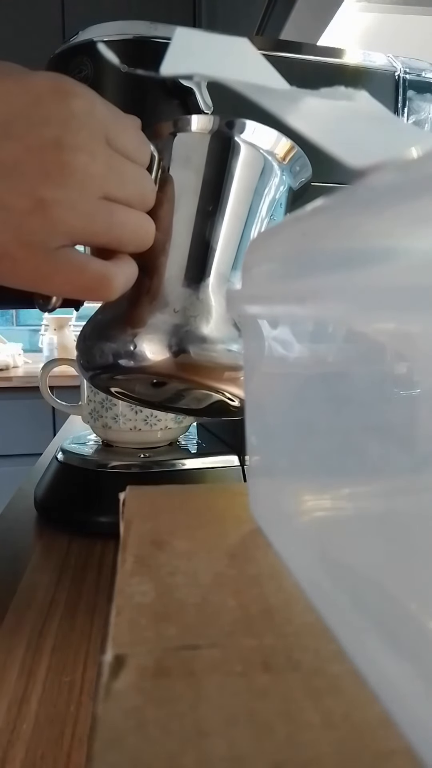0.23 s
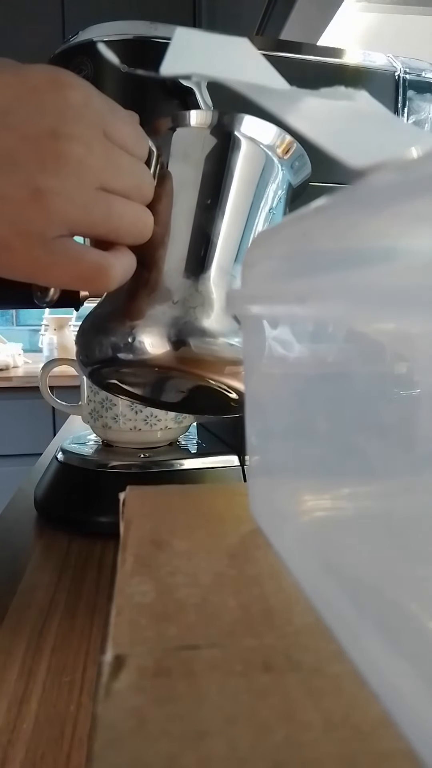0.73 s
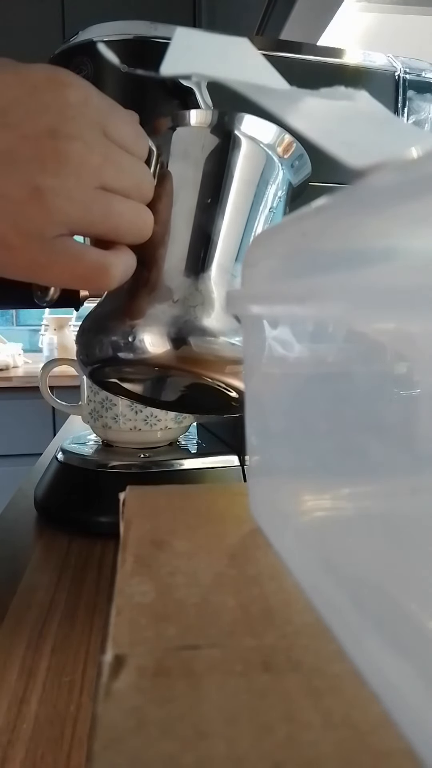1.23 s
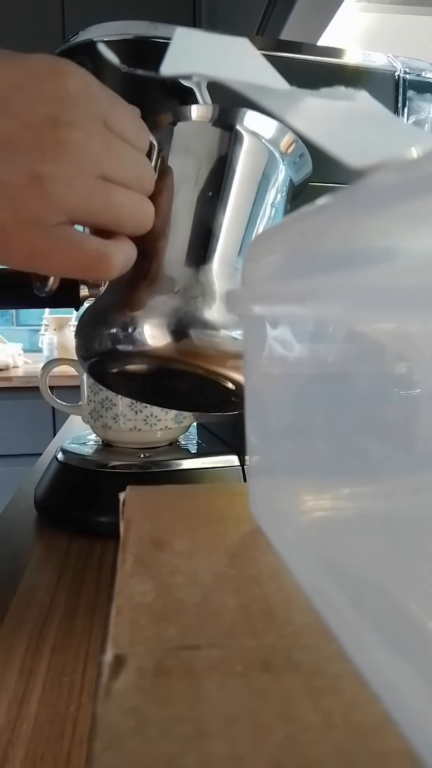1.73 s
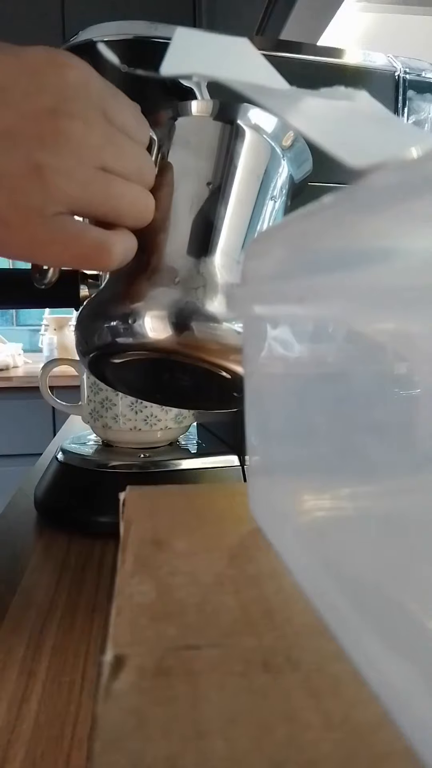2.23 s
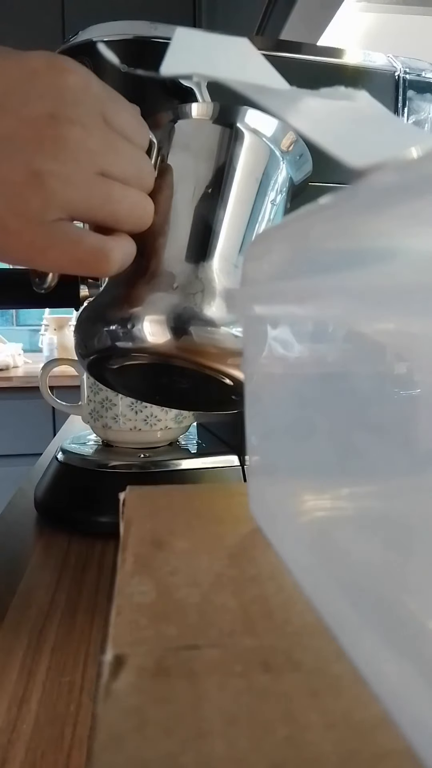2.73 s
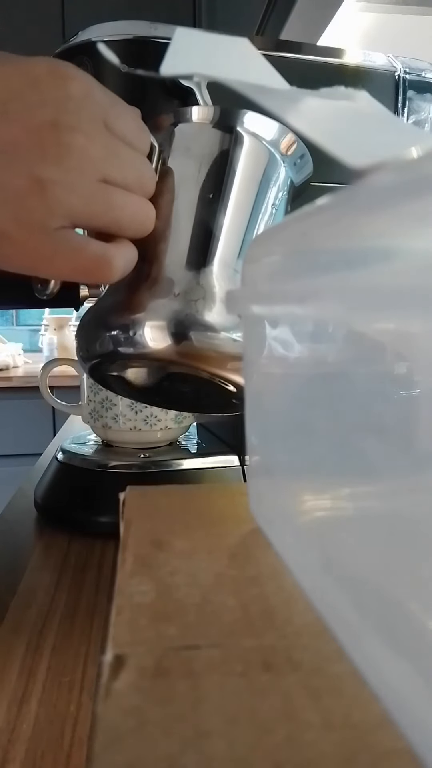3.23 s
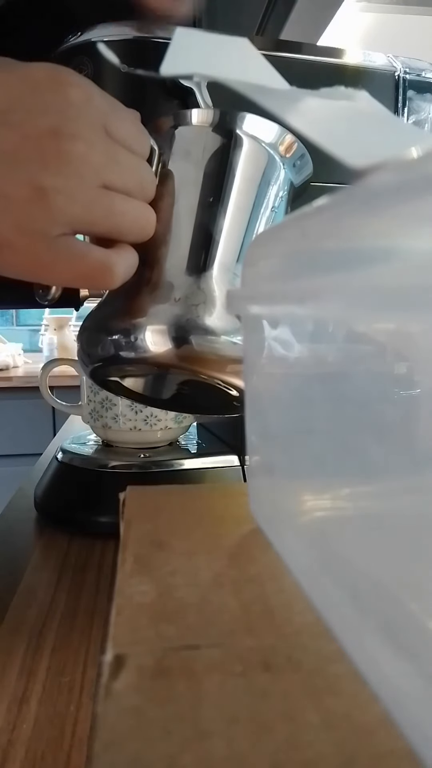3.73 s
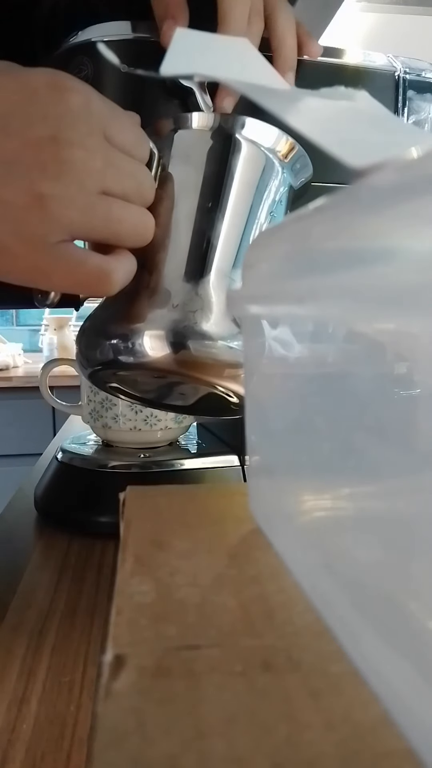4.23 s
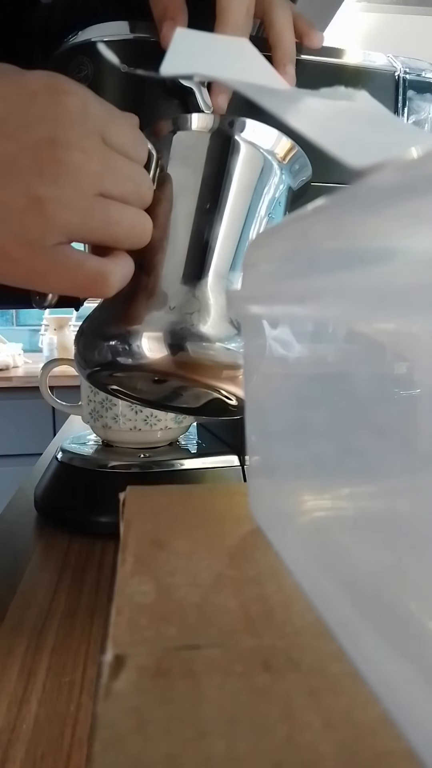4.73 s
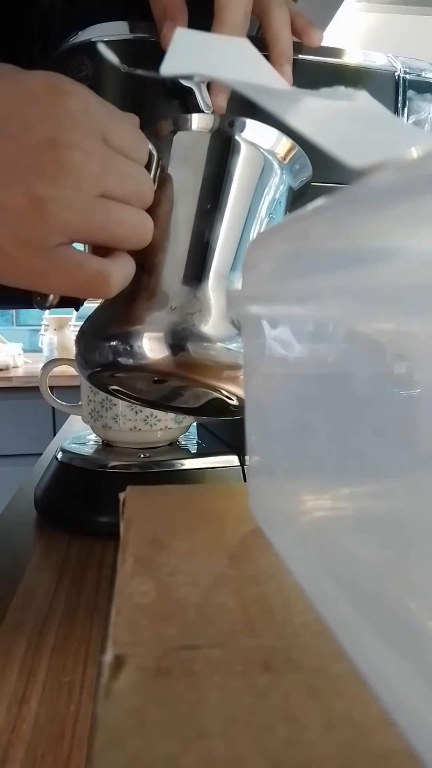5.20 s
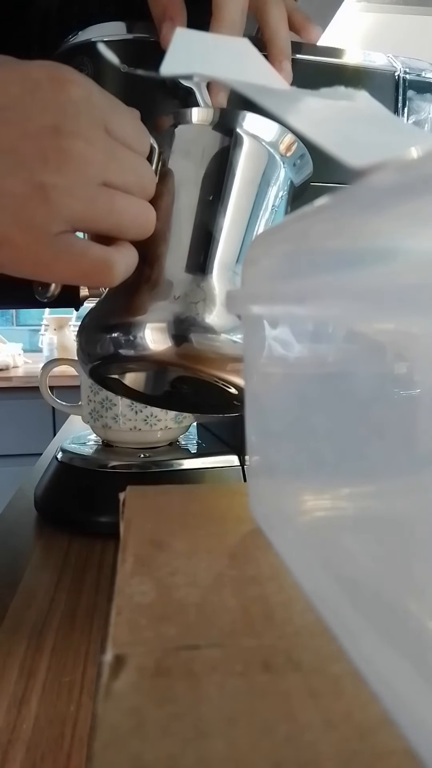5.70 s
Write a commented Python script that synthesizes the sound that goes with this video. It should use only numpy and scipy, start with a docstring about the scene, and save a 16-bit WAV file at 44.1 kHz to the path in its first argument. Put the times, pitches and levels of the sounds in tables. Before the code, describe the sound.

Close-up milk steaming in a small kitchen: sputtering hiss and bubbling, a quiet submerged moan, then renewed spitting and gurgling.

```python
"""A small kitchen, where a steam wand froths milk in a steel jug. With the tip at the surface the jet
tears air in with hissing bursts; sunk, it mostly gurgles. These sounds are modulated noise, filtered by
spectra with narrow resonances and dips. The swirling milk rumbles, bubbles crack, and resonators turn
noise into a moan under the sunk tip and hollow notes in the foam. About once a second the pump buzzes
on mains harmonics."""
import sys
import numpy as np
from scipy import signal
from scipy.io import wavfile
from scipy.ndimage import uniform_filter1d

SR = 44100
rng = np.random.default_rng(int(sys.argv[2]) if len(sys.argv) > 2 else 0)


def int16_out(signal):
    """Quantize to a 16-bit WAV file."""
    q = np.round(np.clip(np.atleast_2d(signal).T, -1, 1) * 32767)
    wavfile.write(sys.argv[1], SR, q.astype(np.int16))


N = 262836
T = np.arange(N) / SR

# spectrum of the tearing hiss: f/Hz, relative level per Hz/dB
HISS_SPECTRUM = [(2060, -23), (3500, -13.5), (4620, -9), (4980, -11), (5380, -9), (5620, -5.5), (7280, -1),
                 (8310, 7.5), (9850, 6.5), (10700, 2.5), (12300, 4.5), (14900, -3.5), (15800, -18)]
# spectrum of the gurgle with the tip at the surface: f/Hz, relative level per Hz/dB
GURGLE_SPECTRUM = [(130, -48), (220, -27), (340, -13), (509, -0.5), (615, -1.5), (742, 3), (949, 2),
                   (1200, -4), (1620, -5.5), (1850, -10.5), (2330, -2.5), (2850, -11.5), (3390, -7),
                   (4100, -15), (4900, -14), (5600, -20), (7000, -14), (9100, -23), (15400, -120)]

HOLD_S, FALL_CURVE = 0.00078, 1.013  # pause at the peak; exponent of the fall, above 1 starts slower
TEAR_HZ, TEAR_HZ_PER_DB, TEAR_SCATTER_HZ = 9220, 166, 750  # harder bursts tear at a higher pitch
BRIGHT_DB, BRIGHT_DB_PER_S = 2.5, 186  # slow bursts make finer bubbles, so a brighter gurgle
BITE_HZ = 6230  # upper edge of the lower part of the hiss
FOAM_WIDTH_HZ = 176  # this and the other note widths are those of one resonator pass of two
JUG_NOTE_HZ, JUG_NOTE_WIDTH_HZ, WHISTLE_HZ, WHISTLE_WIDTH_HZ = 1605, 84, 3370, 110
POCKET_WIDTH_HZ, UPPER_HZ, UPPER_WIDTH_HZ = 120, 954, 160
STEADY = 0.22  # 0: a note flutters like noise; towards 1 it holds its level
KNOCK_DB = -29  # excitation of the jug knock against that of the crack, before the crack's own trim
MAINS_HZ = 51
PUMP_START_S, PUMP_EVERY_S, PUMP_STROKE_S = 0.915, 0.995, 0.11  # a stroke starts to fade at its length
EDGE_HZ = 15750


def gain_of(db):
    """Amplitude ratio: 20 dB is a factor of ten."""
    return 10 ** (np.asarray(db) / 20)


def evened(x):
    """Normalisation by the root mean square, to rms 1."""
    return x / np.sqrt(np.mean(x ** 2) + 1e-20)


def curves(rows):
    """Linear interpolation of each column in time; the end values are held."""
    times, *columns = np.transpose(rows)
    return [np.interp(T, times, column) for column in columns]


def colour(x, points, ring=1, size=8192):
    """Minimum-phase filtering: a spectrum plus narrow peaks and dips, keeping the power of white noise."""
    # narrow resonances and dips of the sound: f/Hz, width/Hz, boost or dip/dB before scaling by ring;
    # those above 8 kHz are thin steady lines in the hiss
    narrow_features = [(296, 6.8, 7), (525.4, 14, 4.5), (753, 14, 8), (800, 200, 1), (871, 15.6, 6.5),
                       (990, 52, 2), (1137, 9.4, -37), (1323, 49, 5), (1639, 60, 7), (2028, 34, 5),
                       (2334, 69, 0), (2530, 380, 3.5), (3325, 250, 3), (3680, 63, 1), (4720, 81, -13.5),
                       (4950, 210, 2.5), (5380, 115, -17), (5680, 180, 7), (8580, 70, 3.5), (9010, 40, 3),
                       (9825, 45, 3.5), (10188, 25, 4.5), (10760, 35, 3), (11187, 35, 3), (12320, 40, 4.5)]
    hz = abs(np.fft.fftfreq(size, 1 / SR))
    f, db = np.transpose(points)
    db = np.interp(np.log(hz + 1), np.log(f + 1), db, left=-80, right=-80)
    for f0, width, boost_db in narrow_features:
        db = db + ring * boost_db / (1 + (2 * (hz - f0) / width) ** 2)
    log_gain = np.log(gain_of(db))
    phase = -signal.hilbert(log_gain).imag  # the Hilbert transform makes the filter causal
    taps = np.fft.ifft(np.exp(log_gain + 1j * phase)).real[:size // 2]
    return signal.oaconvolve(x, taps / np.linalg.norm(taps))[:N]


def resonate(x, hz, width):
    """Heterodyne resonator: shifts the curve hz to zero, smooths, and shifts back."""
    turn = np.exp(2j * np.pi * np.cumsum(hz) / SR)
    r = np.exp(-np.pi * width / SR)
    return 2 * (turn * signal.lfilter([1 - r], [1, -r], x / turn)).real


def note(drive, hz, width, db):
    """Narrow-band resonance of noise, its envelope partly compressed to steady the tone."""
    tone = evened(resonate(resonate(drive, hz, width), hz, width))
    envelope = abs(signal.hilbert(tone))
    return gain_of(db) * evened(tone / (envelope + 0.43) ** STEADY)


def sputter(per_s, spread_db, grain_s, share, patchy_db, streaky_db=0):
    """Amplitude-modulated noise: random bubble collapses swell it; patches of pitch and time flutter."""
    happens = rng.random(N) < per_s / SR
    collapses = gain_of(spread_db * np.minimum(rng.exponential(1, N), 3)) * happens
    pole = [1, -np.exp(-1 / (abs(grain_s) * SR + 1))]
    puffs = evened(signal.lfilter([1], pole, signal.lfilter([1], pole, collapses)))
    noise = (1 + share * puffs) * rng.standard_normal(N)
    z = signal.stft(noise, nperseg=256, noverlap=192)[2]

    def smooth_field(bins, frames):
        field = uniform_filter1d(rng.standard_normal(z.shape), size=bins, axis=0)
        return evened(uniform_filter1d(field, size=frames, axis=1))
    patches = smooth_field(4, 14)
    streaks = smooth_field(2, 50)  # narrower in pitch and longer: random streaks in the noise
    z = z * gain_of(streaky_db * streaks) * gain_of(patchy_db * patches)
    return evened(signal.istft(z, nperseg=256, noverlap=192)[1][:N])


def burst_shapes():
    """Addition of power: overlapping bursts sum, and the loudest dominates the weighted colours."""
    # air tears in: t/s, hiss level/dB, gurgle level/dB, rise/s (at least 0.001),
    # fall to -60 dB/s (sign ignored, at least 0.01)
    bursts = [(.0084, -30, -47, 0.03, 0.3), (.085, -26, -45, 0.0015, 0.36),
              (0.112, -17.5, -23.5, 0.021, 0.16), (0.136, -31, -24.5, 0.0071, 0.18),
              (.146, -19.5, -33, .004, 0.07), (0.254, -15, -36, 0.035, 0.09),
              (0.289, -22, -35, 0.017, 0.04), (0.388, -39, -42, 0.033, -1.3),
              (0.4803, -29.5, -40, .001, 0.02), (.485, -31.5, -47, 0.045, 0.7),
              (.54, -16.5, -35.5, 0.021, 0.16), (0.563, -17, -30, 0.022, 0.05),
              (0.685, -37, -36.5, 0.024, 0.32), (0.778, -27, -38.5, 0.025, 0.1),
              (0.823, -22, -45, 0.015, 0.22), (0.848, -15.5, -39, 0.017, 0.11),
              (0.9545, -20, -30.5, 0.0015, 0.02), (0.962, -16, -35, 0.01, 0.03),
              (1.0592, -15.5, -30, 0.0011, 0.09), (1.075, -23, -33, 0.027, -0.07),
              (1.172, -32, -45, 0.0015, -0.55), (1.2192, -21, -28, 0.0057, 0.05),
              (1.258, -30, -26, 0.0017, 0.2), (1.269, -46, -30, 0.011, 0.57),
              (1.304, -30.5, -39, 0.0055, 0.22), (1.314, -29.5, -35, 0.036, 0.15),
              (1.4, -28.5, -26.5, 0.0032, 0.15), (1.412, -34, -34, 0.024, 0.08),
              (1.4782, -31, -41, 0.03, .1), (1.525, -24, -50, 0.0033, -0.03),
              (1.546, -35.5, -53, 0.0027, -1.5), (1.578, -34, -31, 0.0034, 0.24),
              (1.593, -37, -35, 0.018, 0.25), (1.666, -28.5, -29.5, 0.0056, 0.33),
              (1.691, -16.5, -29, 0.029, 0.05), (1.7895, -42, -30, 0.02, 0.29),
              (1.871, -42, -59, 0.0027, 0.75), (2.065, -40.5, -39.5, 0.0017, 0.26),
              (2.895, -40.5, -45.5, 0.057, 0.18), (3.062, -50, -44, 0.0093, 0),
              (3.31, -54, -52, 0.014, 0.5), (3.485, -42.5, -44, 0.012, 0.2), (3.546, -33.5, -36, 0.03, 0.2),
              (3.64, -36.5, -47, 0.005, 0.27), (3.695, -42.5, -44.5, 0.0084, 0.45),
              (3.741, -35.5, -42.5, 0.021, 0.07), (3.7924, -43.5, -50.5, 0.012, 0.44),
              (3.868, -32.5, -39.5, 0.002, 0.33), (3.878, -33, -35.5, 0.014, 0.1),
              (3.9414, -37, -42.5, 0.0069, 0.06), (3.9953, -36.5, -42, 0.0076, 0.06),
              (4.025, -36.5, -42.5, 0.01, 1.1), (4.072, -19, -30, 0.002, 0),
              (4.076, -21.5, -33, 0.0032, 0.05), (4.094, -22, -32, 0.0012, 0.1),
              (4.137, -18, -27, 0.0056, 0.1), (4.152, -16.5, -29, 0.016, 0.1),
              (4.192, -27, -35, 0.0032, 0.2), (4.238, -20, -33, 0.0032, 0.07),
              (4.246, -19.5, -42, 0.0046, 0), (4.295, -20.5, -28, 0.0052, 0.06),
              (4.303, -18, -28, 0.0087, -0.03), (4.323, -30.5, -29, 0.0077, 0.18),
              (4.396, -33.5, -21.5, 0.0055, 0.24), (4.412, -28, -29, 0.0075, 0.04),
              (4.4931, -36, -47, 0.0037, 0.3), (4.536, -28, -33, 0.0046, 0.17),
              (4.548, -26.5, -25.5, 0.0058, 0.1), (4.631, -22.5, -26.5, 0.006, 0.02),
              (4.666, -34.5, -33, 0.0034, 0.33), (4.685, -24, -22.5, 0.012, 0.03),
              (4.7138, -26.5, -29.5, 0.0081, 0), (4.761, -21.5, -28, 0.0047, 0.12),
              (4.77, -16, -29, 0.015, 0.1), (4.831, -24, -33, 0.0024, 0.04),
              (4.926, -29, -28, 0.0085, 0.06), (4.935, -20.5, -26.5, 0.004, 0.21),
              (4.945, -33, -27, 0.018, 0.1), (4.9725, -42, -31, 0.0026, 0.1),
              (5.002, -30, -36, .001, -0.05), (5.004, -37, -28, 0.0039, 0.28),
              (5.042, -23.5, -28, 0.027, 0.02), (5.1, -55, -29, 0.011, -0.15),
              (5.154, -31, -23, 0.022, 0.18), (5.168, -24, -24, .014, 0.08),
              (5.24, -33.5, -28.5, 0.02, 0.26), (5.323, -30, -29, 0.021, 0.13),
              (5.381, -27.5, -25, 0.018, 0.07), (5.468, -45.5, -30, 0.015, 0),
              (5.517, -34, -31.5, 0.032, 0.07), (5.565, -24.5, -29.5, 0.024, 0.06),
              (5.692, -31.5, -24.5, 0.011, 0.1), (5.735, -42, -31.5, 0.017, 0.37),
              (5.772, -30, -32, 0.019, .05), (5.803, -26, -28, 0.006, 0.07),
              (5.824, -29.5, -31.5, 0.014, 0.2), (5.911, -33.5, -35.5, 0.022, 0.02)]
    hiss, gurgle = np.full(N, 1e-12), np.full(N, 1e-12)
    centre, bright = TEAR_HZ * hiss, 0 * gurgle
    for (s, hiss_db, gurgle_db, rise, t60), chance in zip(bursts, rng.standard_normal(len(bursts))):
        start, rise = max(round(s * SR), 0), max(rise, 0.001)
        hz = TEAR_HZ + TEAR_HZ_PER_DB * (hiss_db + 24.0) + TEAR_SCATTER_HZ * chance
        t = T[start:start + SR // 2] - T[start]
        at = slice(start, start + len(t))
        falling_s = np.maximum(t - rise - HOLD_S, 0)
        fall = gain_of(-60 * (falling_s / max(abs(t60), 0.01)) ** FALL_CURVE)
        shape = np.minimum(t / rise, 1) * fall
        hiss_power = (shape * gain_of(hiss_db)) ** 2
        gurgle_power = (shape * gain_of(gurgle_db)) ** 2
        hiss[at] += hiss_power
        centre[at] += hiss_power * hz
        gurgle[at] += gurgle_power
        bright[at] += gurgle_power * (BRIGHT_DB + BRIGHT_DB_PER_S * rise)
    return hiss, centre / hiss, gurgle, bright / gurgle


def jet():
    """Source and filter: tearing hiss above, gurgle below, and the rumble of swirling milk."""
    # jet between bursts: t/s, hiss level/dB, gurgle level/dB, added brightness of the burst gurgle/dB
    jet_levels = [(0.0, -31, -38, 5), (0.2, -43, -41, -12), (0.26, -36, -43.5, 2.5), (0.61, -34, -39.5, 3),
                  (0.93, -42, -46, 5), (0.98, -28, -39, -3.5), (1.2, -36.5, -39.5, 0),
                  (1.58, -41.5, -36, 4.5), (1.8, -36, -37, -1), (1.99, -56, -42.5, -6),
                  (2.31, -54, -50, 12), (2.8, -53, -48, 15), (2.95, -51, -46.5, -2.5),
                  (3.2, -52.5, -51, -1), (3.45, -53, -47, 0), (3.7, -54, -45, 1), (4.03, -48.5, -46, -4.5),
                  (4.26, -39, -37.5, 3.5), (4.6, -34, -31, 2.5), (4.75, -40.5, -40.5, 3),
                  (4.85, -33, -34.5, 4.5), (5.45, -41.5, -35, 0), (5.51, -36.5, -37, 7),
                  (5.96, -47, -35.5, 1)]
    # depth of the tip: t/s, depth (surface 0, just under 1, sunk 2)
    tip_depth = [(0, 0), (1.85, 0), (2.2, 2), (2.85, 2), (3.0, 1.5), (3.5, 1), (3.9, 1), (4.1, 0),
                 (5.96, 0)]
    # lower part of the hiss against the top: t/s, relative level/dB
    bite = [(0, -1), (1.0, 4), (1.2, -8.5), (1.32, 14), (1.5, 10), (1.7, 3.5), (1.9, 4), (2.2, 4), (3.5, 0),
            (4.2, -23), (4.4, 7.5), (4.9, 5.5), (5.1, 5.5), (5.3, -2), (5.6, 6), (5.96, 5)]
    # hiss muffled by milk: f/Hz, relative level per Hz/dB
    fizz_spectrum = [(2060, -55), (3500, -25), (4680, -10), (5280, 6), (5660, 1), (6200, 4.5), (8150, 7),
                     (9080, 8), (11500, 4.5), (12300, 3), (13000, -2), (15800, -9)]
    # gurgle just under the foam: f/Hz, relative level per Hz/dB
    shallow_spectrum = [(130, -68), (220, -25), (310, -11), (400, -13.5), (520, -6), (900, -5),
                        (1150, -3.5), (1350, -1.5), (1620, -2.5), (1800, -10.5), (2400, -4), (2900, -12),
                        (3390, -7), (3900, -16.5), (7200, -21)]
    # gurgle muffled by milk: f/Hz, relative level per Hz/dB
    sunk_spectrum = [(130, -57), (220, -23), (310, -1), (450, -16), (800, -6.5), (1250, -11.5),
                     (1570, -1.5), (1750, -21), (2050, -5), (2410, 1.5), (2900, -15.5), (3350, -11.5),
                     (4200, -16), (5500, -14), (7200, -48)]
    # the milk swirls: t/s, rumble level/dB
    swirl_levels = [(0.0, -54), (0.18, -59.5), (0.28, -73), (0.51, -59), (0.73, -57), (0.75, -48),
                    (0.86, -75), (0.96, -52.5), (1.29, -50.5), (1.31, -57), (1.64, -56), (1.99, -49.5),
                    (2.26, -65), (2.89, -62.5), (2.97, -52), (3.25, -63.5), (4.05, -57.5), (4.08, -42.5),
                    (4.12, -52), (4.6, -51), (4.85, -59.5), (5.45, -49), (5.54, -57), (5.59, -48),
                    (5.66, -52.5), (5.96, -46)]
    # spectrum of the rumble: f/Hz, relative level per Hz/dB
    rumble_spectrum = [(12, -52), (20, -32), (27, -30), (70, -23), (140, -2), (162, -2.5), (199, -20),
                       (246, -35), (260, -31), (340, -17), (570, -120)]

    hiss_db, gurgle_db, added_bright_db = curves(jet_levels)
    hiss_power, centre_hz, gurgle_power, bright_db = burst_shapes()
    bright_db = bright_db + added_bright_db
    depth = curves(tip_depth)[0]
    # equal-power crossfade between the three depths
    surface, shallow, sunk = (np.sqrt(np.clip(1 - abs(depth - k), 0, 1)) for k in range(3))

    tear = sputter(per_s=500, spread_db=15.5, grain_s=0.00034, share=0.23, patchy_db=3, streaky_db=2.5)
    band = 0.5 * evened(resonate(tear, centre_hz, 2800))  # each burst has its own bright band
    torn = evened(tear + band) * np.sqrt(hiss_power)
    hiss = colour(torn + tear * gain_of(hiss_db) * surface, HISS_SPECTRUM)
    lower = signal.sosfiltfilt(signal.butter(3, BITE_HZ, fs=SR, output="sos"), hiss)
    hiss = hiss + lower * (gain_of(curves(bite)[0]) - 1)
    fizz = sputter(per_s=150, spread_db=1, grain_s=0.002, share=0.1, patchy_db=0.6) * gain_of(hiss_db)
    hiss += colour(fizz * np.sqrt(1 - surface ** 2), fizz_spectrum, ring=0.27)

    spit = sputter(per_s=90, spread_db=3.5, grain_s=0.0036, share=0.48, patchy_db=2.5, streaky_db=1.2)
    large = signal.sosfilt(signal.butter(2, 1600, fs=SR, output="sos"), spit)  # large bubbles sound low
    tilt = gain_of(bright_db / 2)
    spit = (large / tilt + (spit - large) * tilt) * np.sqrt(gurgle_power)
    simmer = sputter(per_s=90, spread_db=2, grain_s=0.002, share=0.25, patchy_db=1.8, streaky_db=1.5)
    churn = spit + simmer * gain_of(gurgle_db)
    gurgle = colour(churn * surface, GURGLE_SPECTRUM)
    gurgle = gurgle + colour(churn * shallow, shallow_spectrum) + colour(churn * sunk, sunk_spectrum)

    swirl = sputter(per_s=15, spread_db=3, grain_s=0.02, share=0.6, patchy_db=0)
    rumble = colour(swirl * gain_of(curves(swirl_levels)[0]), rumble_spectrum)
    return hiss + gurgle + rumble


def foam(drive):
    """Resonance driven by noise: hollow foam, jug note and thin whistle, held steady until 2.8 s."""
    # foam over the rising tip: t/s, resonance f/Hz, level/dB, jug note level/dB, whistle level/dB
    foam_notes = [(2.8, 1320, -51, -66, -74), (2.93, 1310, -48, -57, -47), (3.06, 1340, -46.5, -52.5, -53),
                  (3.21, 1350, -58, -57, -67), (3.35, 1390, -45.5, -54, -59), (3.44, 1370, -60, -59, -67),
                  (3.5, 1340, -53, -44, -49), (3.58, 1310, -46, -52, -61), (3.69, 1350, -52, -50, -61),
                  (3.72, 1330, -50, -41, -60), (3.74, 1350, -57, -57, -57), (3.76, 1320, -46, -39, -53),
                  (3.79, 1320, -57, -52, -62), (3.82, 1320, -47, -34.5, -66), (3.86, 1310, -54, -52, -60),
                  (3.93, 1300, -54, -50, -46), (4.04, 1330, -46, -40, -54), (4.15, 1300, -74, -62, -70)]
    foam_hz, foam_db, jug_db, whistle_db = curves(foam_notes)
    hollow = note(drive, foam_hz, FOAM_WIDTH_HZ, foam_db)
    jug_note = note(drive, JUG_NOTE_HZ + 0 * T, JUG_NOTE_WIDTH_HZ, jug_db)
    return hollow + jug_note + note(drive, WHISTLE_HZ + 0 * T, WHISTLE_WIDTH_HZ, whistle_db)


def snaps(crack_s=0.0007, knock_s=0.002):
    """Impulsive excitation: a collapse gives a crack and a knock on the jug, each decaying noise."""
    # steam bubbles crack at the tip: t/s, level of the excitation/dB before filter and trim
    collapses = [(.0858, -26), (.2705, 1), (.2745, 1.5), (0.479, -23), (.7828, -16), (0.819, -29),
                 (0.9574, -19), (0.9645, -10), (0.9762, 2), (1.059, -10), (1.068, -2), (1.097, -2),
                 (1.173, -18), (1.223, -14), (1.259, -18), (1.581, -26), (1.6701, -18), (1.712, -13),
                 (2.066, -31), (3.869, -19), (4.075, -28), (4.095, -10), (4.139, -12), (4.1659, -9),
                 (4.239, -7), (4.539, -13), (4.6344, -12), (4.771, -9), (4.782, -9), (4.8335, -21.5),
                 (4.9362, -8), (4.9685, 2), (5.0647, -7.5), (5.1748, -14), (5.399, -16), (5.699, -23),
                 (5.8071, -18)]
    crack, knock, t = np.zeros(N), np.zeros(N), T[:600]
    for (s, db), noise in zip(collapses, rng.standard_normal((len(collapses), 2, len(t)))):
        at = slice(round(s * SR), round(s * SR) + len(t))
        room = len(crack[at])
        crack[at] += (gain_of(db) * noise[0] * np.exp(-t / crack_s))[:room]
        knock[at] += (gain_of(db + KNOCK_DB) * noise[1] * np.exp(-t / knock_s))[:room]
    return gain_of(-12) * colour(crack, HISS_SPECTRUM) + colour(knock, GURGLE_SPECTRUM)


def pump():
    """Harmonic series: short buzzes on mains multiples; each piston knock also rattles the housing."""
    # partials of the buzz: multiple of the mains frequency, relative level/dB
    partials = [(1, 5), (2, -34), (3, 12.5), (4, 8.5), (6, -3)]
    # one value a stroke: level/dB of the buzz, which the rattle adds to
    stroke_db = [-62, -54, -56, -61, -57, -58]
    buzz = evened(sum(gain_of(db) * np.sin(2 * np.pi * (k * MAINS_HZ * T + rng.random()))
                      for k, db in partials))
    cycle = MAINS_HZ * T % 1
    knocks = np.exp(-cycle / 0.086) * rng.standard_normal(N)
    sound = buzz + gain_of(-7) * colour(evened(knocks), GURGLE_SPECTRUM)
    stroke, since = np.divmod(T - PUMP_START_S, PUMP_EVERY_S)
    fade = 1 + (PUMP_STROKE_S - since) / 0.05
    on = np.clip(np.minimum(since / 0.025, fade), 0, 1)
    return gain_of(stroke_db)[stroke.astype(int)] * (stroke >= 0) * on * sound


def pocket(drive):
    """Cavity resonance: the air pocket under the sunk tip moans, with a second note above."""
    # air pocket: t/s, resonance f/Hz, level/dB, upper note level/dB
    pocket_notes = [(1.95, 650, -72, -66), (2.1, 595, -47.5, -58), (2.17, 590, -49.5, -44.5),
                    (2.27, 643, -42.5, -47), (2.4, 620, -45, -44.5), (2.45, 590, -47, -56),
                    (2.6, 560, -49.5, -56), (2.74, 595, -44.5, -59), (2.82, 533, -47, -51),
                    (2.97, 527, -53.5, -70), (3.12, 524, -53, -74), (3.25, 505, -64.5, -74)]
    hz, low_db, upper_db = curves(pocket_notes)
    moan = note(drive, hz, POCKET_WIDTH_HZ, low_db)
    return moan + note(drive, UPPER_HZ + 0 * T, UPPER_WIDTH_HZ, upper_db)


def kitchen(x, t60=0.11, first_s=0.002):
    """Exponential reverberation: sparse echoes of random sign that fall 60 dB in t60 seconds."""
    at = np.arange(round(first_s * SR), SR // 2, 22)
    signs = rng.choice([-1., 1.], len(at))
    taps = np.zeros(SR)
    taps[at + rng.integers(0, 22, len(at))] = signs * gain_of(-60 * at / SR / t60)
    return signal.oaconvolve(x, taps / np.linalg.norm(taps))[:N]


def scene():
    """Superposition: jug and machine close by, with the kitchen's echo."""
    drive = sputter(per_s=40, spread_db=2, grain_s=0.008, share=0.25, patchy_db=0)  # excites the notes
    near = jet() + foam(drive) + snaps() + pump() + pocket(drive)
    treble = signal.sosfilt(signal.butter(2, 1500, "high", fs=SR, output="sos"), near)
    return (near + gain_of(-12) * kitchen(treble))[None]  # hard walls return mostly the treble


def record(dry):
    """Saturation and band limiting: the input stage rounds off the loudest peaks, then a low-pass."""
    ceiling = 1.1
    rounded = ceiling * np.tanh(dry / ceiling)
    low_pass = signal.firwin(511, EDGE_HZ, window=("kaiser", 9), fs=SR)
    return signal.oaconvolve(rounded, low_pass[None], "same")


dry = scene()
out = record(dry)
int16_out(out)
```